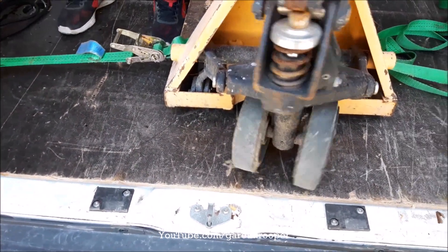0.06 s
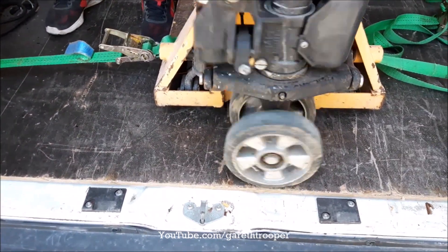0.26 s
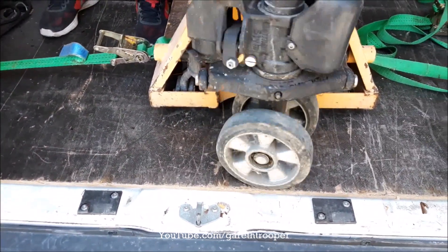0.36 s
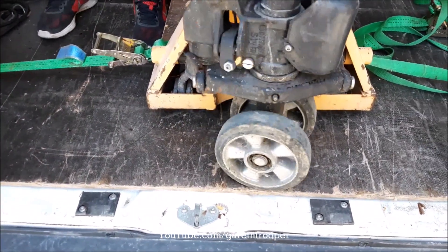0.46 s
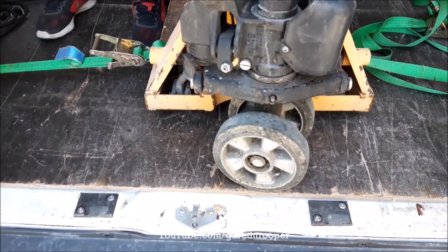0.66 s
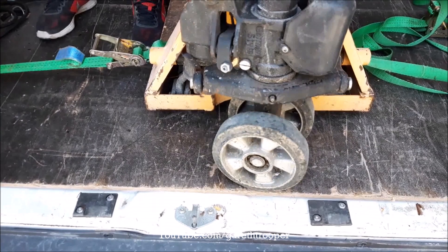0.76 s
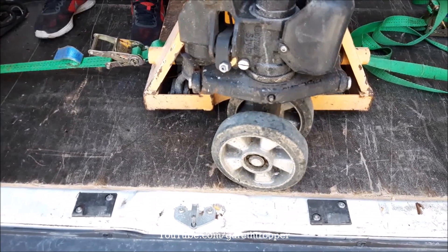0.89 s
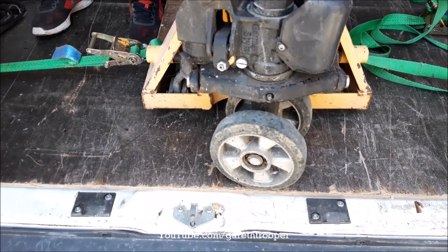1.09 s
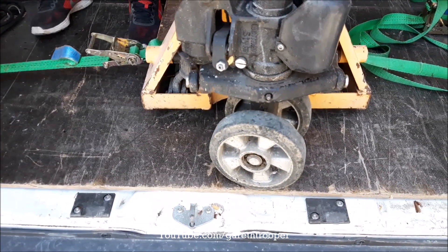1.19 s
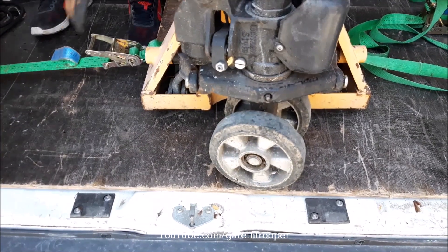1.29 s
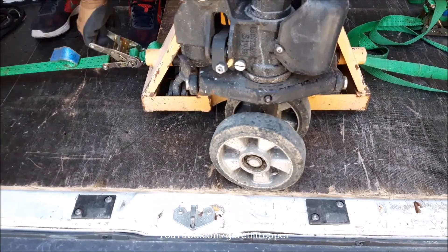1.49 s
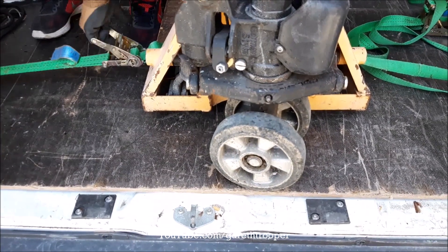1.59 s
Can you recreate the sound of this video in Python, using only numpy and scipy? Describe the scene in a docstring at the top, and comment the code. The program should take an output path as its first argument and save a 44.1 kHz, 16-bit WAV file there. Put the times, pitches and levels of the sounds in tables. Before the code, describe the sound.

A loud, ringing metal clunk from a hand pallet truck's steering hitting its stop, preceded by bright linkage clicks, wheel knocks and tyre scrub; after a quiet gap, a weak strap ratchet clank. Close microphone, lorry deck outdoors.

```python
"""Tyres scrub faintly, a handle linkage clicks and a yard hums: a hand pallet truck's steering wheels
are swung round on a lorry floor. Wheels and handle base knock, then the steering hits its stop with a clunk
that drives the limiter. Later a strap slides, its ratchet clanks and the deck answers late.
Struck parts are decaying tones plus noise dying band by band; scrub, hum and a faint treble hiss are
shaped noise. A long dim echo comes from the yard."""
import sys
import numpy as np
from scipy import signal
from scipy.fft import rfft, irfft
from scipy.io import wavfile
from scipy.ndimage import uniform_filter1d

SR = 44100
rng = np.random.default_rng(int(sys.argv[2]) if len(sys.argv) > 2 else 0)


def magnitude_from_level(level_db):
    """Linear magnitude for a level in decibels (20 dB per decade)."""
    exponent = np.asarray(level_db, float) / 20
    return 10 ** exponent


def wav_out(sig):
    """Save sig, one row per channel (or a flat mono array), as 16-bit PCM at SR to the path in sys.argv[1]."""
    wavfile.write(sys.argv[1], SR, np.round(np.clip(np.atleast_2d(sig).T, -1, 1) * 32767).astype(np.int16))


N = 72765   # length in samples
TIME_S = np.arange(N) / SR
BAND_EDGES_HZ = 22 * 2 ** np.arange(0, 9.6, 1 / 3)   # third-octave steps


def rms_one(x):
    """Scales a signal so that its average strength (root mean square) is one."""
    return x / np.sqrt(np.mean(x ** 2) + 1e-20)


def in_time(rows):
    """Draws straight lines between (time, level) points, one value per sample."""
    return np.interp(TIME_S, *np.transpose(rows))


def at_hz(rows, hz, column=1):
    """Reads a table column at any frequency, along a logarithmic pitch scale."""
    rows = np.array(rows)
    return np.interp(np.log(hz), np.log(rows[:, 0]), rows[:, column])


def bands(lump_db=0):
    """Yields centre and noise of each third-octave band, equally dense; lump_db makes the spectrum uneven."""
    lump_hz, warm_up = 45, 4000   # spacing of the lumps; samples cut off while the filters settle
    white = rng.standard_normal((2, N + warm_up))
    hz = np.fft.rfftfreq(N + warm_up, 1 / SR)
    lumps = magnitude_from_level(lump_db * np.interp(hz / lump_hz, np.arange(2000), rng.standard_normal(2000)))
    white = irfft(rfft(white) * rms_one(lumps), N + warm_up)
    for k, (low, high) in enumerate(zip(BAND_EDGES_HZ, BAND_EDGES_HZ[1:])):
        sos = signal.butter(2, [low, high], "band", fs=SR, output="sos")
        # neighbouring bands use different noises
        yield np.sqrt(low * high), signal.sosfilt(sos, white[k % 2])[warm_up:]


def wobble(rate_per_s, spread_db):
    """Random gain that glides between new values, rate_per_s times a second."""
    knots = rng.standard_normal(200)
    return magnitude_from_level(spread_db * np.interp(TIME_S * rate_per_s, np.arange(200), knots))


def coloured(spectrum, patchy_db):
    """Noise of a given spectrum, each band flickering by itself, at average strength one."""
    total = np.zeros(N)
    for hz, noise in bands():
        total += magnitude_from_level(at_hz(spectrum, hz)) * wobble(30, patchy_db) * noise
    return rms_one(total)


def swell(start_s, hz, t60_s):
    """Envelope of a struck ring: a short rise, then a steady fall of 60 dB per t60_s."""
    rise_cycles = 0.86   # time constant of the rise, in cycles of the ring
    age_s = np.maximum(TIME_S - start_s, 0)
    return (1 - np.exp(-age_s * hz / rise_cycles)) * magnitude_from_level(-60 * age_s / t60_s)


def dense_ring(blows, dense):
    """A part's many close modes, heard as noise dying band by band; each blow opens with a crack."""
    crack_db, crack_t60_s = 2.5, 0.0089   # crack level is above the ring
    out = np.zeros(N)
    density = magnitude_from_level(at_hz(dense, BAND_EDGES_HZ[1:])) ** 2
    size = np.sqrt(np.sum(np.diff(BAND_EDGES_HZ) * density) / (SR / 2))
    for hz, noise in bands(lump_db=2.5):   # close modes bunch unevenly along the spectrum
        t60_s = at_hz(dense, hz, column=2)
        crack = magnitude_from_level(crack_db)
        power = np.zeros(N)
        for start_s, db, length in blows:
            ring_power = swell(start_s, hz, length * t60_s) ** 2
            crack_power = (crack * swell(start_s, hz, crack_t60_s)) ** 2
            power += magnitude_from_level(db) ** 2 * (ring_power + crack_power)
        rattle = wobble(110, 1.5)   # loose parts rattle
        out += magnitude_from_level(at_hz(dense, hz)) / size * np.sqrt(power) * rattle * noise
    return out


def clear_modes(blows, modes, modes_db):
    """The clear tones of a struck part: each mode is a close pair of sines that beat as they die."""
    strength_spread_db = 1.5
    split_hz = 1.2   # widest gap within a pair, per root Hz
    partner = 0.4   # strength of the second sine
    out = np.zeros(N)
    for hz, level_db, t60_s in modes:
        split, phase_one, phase_two = rng.uniform(-1, 1, 3)
        strengths = rng.standard_normal(len(blows))
        power = np.zeros(N)
        for (start_s, db, length), luck in zip(blows, strengths):
            power += (magnitude_from_level(db + strength_spread_db * luck) * swell(start_s, hz, length * t60_s)) ** 2
        gap_hz = np.sign(split) * (1 + abs(split)) / 2 * split_hz * np.sqrt(hz)
        pair = np.sin(2 * np.pi * hz * TIME_S + np.pi * phase_one)
        pair += partner * np.sin(2 * np.pi * (hz + gap_hz) * TIME_S + np.pi * phase_two)
        waver = wobble(35, 2.5)   # modes fade unevenly
        out += magnitude_from_level(modes_db + level_db) * np.sqrt(power) * waver * pair
    return out


def struck(blows, modes, dense, modes_db):
    """Every blow feeds both the clear tones of a part and its many close modes."""
    return dense_ring(blows, dense) + clear_modes(blows, modes, modes_db)


# In all tables of blows, the ring length multiplies the t60 of the part.
# t60 is the time a ring takes to fall by 60 dB.

# Strength of the tyres dragged sideways, before the fade at the stop: (time [s], level [dB])
SCRUB_LEVEL = [(0.0, -41.5), (0.106, -49.5), (0.136, -25), (0.156, -28.5), (0.198, -29.5), (0.244, -34),
               (0.302, -38), (0.34, -29), (0.376, -12.5), (0.426, -20.5), (0.572, -51.5), (0.6, -53.5)]
# Tone colour of the tyres: (frequency [Hz], relative level per Hz [dB])
TYRE_SPECTRUM = [(18, -44), (30, -13), (393, -1.5), (524, -1), (853, -7), (1110, -8.5), (1700, -7.5),
                 (2210, -15), (3370, -12.5), (6000, -23.5), (7800, -50.5), (13200, -120)]


def tyre_scrub():
    """Lumpy low rumble of tyres dragged over the deck, dying once the steering stops."""
    stop_s, fade_db_per_s = 0.38, 200.5
    fade_db = fade_db_per_s * np.maximum(TIME_S - stop_s, 0)
    return magnitude_from_level(in_time(SCRUB_LEVEL) - fade_db) * coloured(TYRE_SPECTRUM, patchy_db=3.5)


# Strength of the yard hum: (time [s], level [dB])
HUM_LEVEL = [(0.75, -59), (0.898, -62.5), (1.46, -66)]
# Tone colour of the hum: (frequency [Hz], relative level per Hz [dB])
HUM_SPECTRUM = [(15, -44.5), (30, -12), (120, -3.5), (270, 0), (400, -11), (620, -14.5), (1100, -12.5),
                (2100, -27), (5000, -32.5), (9500, -35.5), (11000, -45.5), (15500, -52)]


def yard_hum():
    """Faint, mostly low noise from the yard, its bands flickering slightly."""
    return magnitude_from_level(in_time(HUM_LEVEL)) * coloured(HUM_SPECTRUM, patchy_db=1.5)


# Strength of the treble hiss: (time [s], level [dB])
HISS_LEVEL = [(.7, -76.5), (.95, -72), (1.03, -86), (1.14, -83), (1.16, -74.5), (1.3, -79), (1.35, -96),
              (1.65, -95.5)]
# Tone colour of the hiss: (frequency [Hz], relative level per Hz [dB])
HISS_SPECTRUM = [(1180, -35), (2000, -6.5), (2200, -18), (2540, -2), (3330, -10), (4360, 1.5), (4950, -6),
                 (12000, -24), (15600, -51.5), (22000, -120)]


def treble_hiss():
    """Faint treble background hiss whose level rises and falls."""
    return magnitude_from_level(in_time(HISS_LEVEL)) * coloured(HISS_SPECTRUM, patchy_db=2.5)


def yard_echo(near):
    """Long dim echo from the yard: the near sound is smeared over slowly dying, band-limited noise."""
    level_db, t60_s, low_hz, high_hz = -50.5, 1.4, 500, 7000
    tail = rng.standard_normal(N) * magnitude_from_level(-60 * TIME_S / t60_s)
    tail = signal.sosfilt(signal.butter(1, [low_hz, high_hz], "band", fs=SR, output="sos"), tail)
    tail = tail / np.sqrt(np.sum(tail ** 2))
    return magnitude_from_level(level_db) * signal.fftconvolve(near, tail)[:N]


# Blows on the handle linkage: (time [s], level [dB], ring length [factor])
LINKAGE_BLOWS = [(.004, -45.5, 1), (.013, -25.5, 0.74), (.0175, -29.5, .6), (.023, -32.5, 2.7),
                 (.0777, -25, 1.2), (.215, -26.5, 1.5), (.27, -29.5, 1.9), (.333, -31, 0.24),
                 (.527, -37, 0.41), (.536, -40, 1.5)]
# Its clear tones: (frequency [Hz], relative level [dB], t60 [s])
LINKAGE_TONES = [(4500, 4, 0.02), (5460, -12, 0.24), (6740, 1.5, 0.049), (7640, -6.5, 0.046),
                 (10100, -17.5, 0.17), (11030, -26, 0.25), (11510, -15.5, 0.17), (13800, -21.5, 0.082)]
# Its dense ring: (frequency [Hz], relative level [dB], t60 [s])
LINKAGE_RING = [(1477, -35, .12), (3300, -10.5, .15), (4300, -1.5, 0.059), (7000, -0.5, .11),
                (10000, -5.5, 0.063), (12120, -7.5, 0.06), (15500, -9.5, .09)]


def linkage_clicks():
    """The handle linkage clicks: light blows with a bright ring."""
    return struck(LINKAGE_BLOWS, LINKAGE_TONES, LINKAGE_RING, modes_db=-5.5)


# Single short rings: (time [s], frequency [Hz], level [dB], t60 [s])
SMALL_RINGS = [(.008, 1935, -43, 0.056), (.13, 230, -24.5, 0.082), (.152, 251, -13.5, 0.056),
               (.259, 7660, -34, 0.12), (.271, 7550, -27.5, .1), (.332, 3200, -28, .012),
               (.3345, 4800, -30, .012), (.337, 2400, -30, .012), (.325, 408, -23.5, .1),
               (.336, 433, -34, .05), (1.119, 3300, -62, 0.01), (1.123, 3600, -55.5, 0.022),
               (1.151, 6100, -50.5, 0.0085), (1.1505, 7600, -63, .003), (1.1505, 9300, -60, .003)]


def small_ticks():
    """Small parts and the deck tick: each is one short sine ring."""
    out = np.zeros(N)
    for start_s, hz, db, t60_s in SMALL_RINGS:
        out += magnitude_from_level(db) * swell(start_s, hz, t60_s) * np.sin(2 * np.pi * hz * (TIME_S - start_s))
    return out


# Blows on the wheels: (time [s], level [dB], ring length [factor])
WHEEL_BLOWS = [(.1095, -22, 0.62), (.1235, -40, 0.66), (.137, -34, 1)]
# Their clear tones: (frequency [Hz], relative level [dB], t60 [s])
WHEEL_TONES = [(249, -11, 0.28), (560, -9, 0.22), (758, -6, 0.41), (1510.3, 1.5, .22), (1980, -2, .15),
               (3250, -2, .16), (4330, -7, .12), (4700, -4, .12), (5200, -2, 0.13), (6788, -13, 0.14),
               (9140, -18, .17)]
# Their dense ring: (frequency [Hz], relative level [dB], t60 [s])
WHEEL_RING = [(150, -23, .4), (300, -6, 0.32), (905, -4, 0.21), (1740, -0.5, 0.21), (3200, -6.5, 0.19),
              (4714, -10, .3), (7000, -17.5, 0.41), (11000, -21, 0.22), (15630, -28, .3)]


def wheel_knocks():
    """The wheels knock, ringing mostly below the clicks of the linkage."""
    return struck(WHEEL_BLOWS, WHEEL_TONES, WHEEL_RING, modes_db=-6)


# Blows on the handle base: (time [s], level [dB], ring length [factor])
BASE_BLOWS = [(.23, -21.5, 0.48), (.234, -20, 0.96), (.258, -30.5, 0.58)]
# Its clear tones: (frequency [Hz], relative level [dB], t60 [s])
BASE_TONES = [(238, -4.5, .2), (524.2, -11.5, .2), (654, -15.5, .35), (797, -6.5, 0.49), (1219, -5.5, 0.67),
              (1295, -6, .35), (1810, -14, .15), (2100, -1, 0.42), (2760, -16, 0.18), (3160, -11.5, 0.31),
              (3740, -12.5, .24), (4760, -19.5, .14), (8899, -30.5, .3), (13300, -32, .3)]
# Its dense ring: (frequency [Hz], relative level [dB], t60 [s])
BASE_RING = [(306, -1, 0.13), (714, -2.5, 0.57), (1300, 1, 0.36), (2100, -3.5, 0.32), (3600, -10, 0.83),
             (5600, -21, .3), (10000, -22, 0.1), (15500, -34.5, .3)]


def handle_base_knocks():
    """The handle base knocks, with strong low and middle tones."""
    return struck(BASE_BLOWS, BASE_TONES, BASE_RING, modes_db=-0.5)


# Blows of the steering on its stop: (time [s], level [dB], ring length [factor])
STOP_BLOWS = [(.3512, -2, 0.7), (.357, -2.5, 0.61), (.364, -2, 0.83), (.382, -9, 1), (.412, -13, 1),
              (.443, -16.5, 0.58)]
# Clear tones of the truck frame: (frequency [Hz], relative level [dB], t60 [s])
FRAME_TONES = [(254, 5, .22), (786, -8, .38), (851, -5, .39), (1217, -8, .33), (1357, -9, .4),
               (1504, -2, .35), (1522, -1, .26), (1724, -2, .26), (1878, -4, .26), (2019, -6, .26),
               (2304, -10, .38), (2519, -11, .4), (2697, -9, .33), (2839, 3, .22), (3079, -6, .32),
               (3311, -3, .24), (3450, 0, .28), (3601, -5, .26), (3795, -5, .24), (4066, -7, .3),
               (4585, -8, .25), (5076, -11, .25), (6387, -22, .48), (6850, -12, .2), (9722, -29, .45),
               (13300, -37, .4)]
# Dense ring of the frame: (frequency [Hz], relative level [dB], t60 [s])
FRAME_RING = [(100, -25, 0.67), (250, -8, 0.58), (450, -9, 0.24), (740, -2, .38), (1400, -3, .35),
              (3200, 2, 0.34), (5070, -6, .33), (6870, -4.5, 0.24), (8800, -15, 0.19), (11900, -20, 0.23),
              (15500, -32.5, .25)]


def steering_stop_clunk():
    """The steering hits its stop: several hard blows set the frame ringing."""
    return struck(STOP_BLOWS, FRAME_TONES, FRAME_RING, modes_db=-7.5)


def strap_rub():
    """The strap slides before the clank: a short swell of narrow hiss."""
    start_s, length_s = 1.375, 0.18
    centre_hz, width_hz, level_db = 3480, 520, -76.5
    shape = np.sin(np.pi * np.clip((TIME_S - start_s) / length_s, 0, 1))
    edges_hz = [centre_hz - width_hz / 2, centre_hz + width_hz / 2]
    sos = signal.butter(2, edges_hz, "band", fs=SR, output="sos")
    return magnitude_from_level(level_db) * shape * rms_one(signal.sosfilt(sos, rng.standard_normal(N)))


# Blows in the strap ratchet: (time [s], level [dB], ring length [factor])
RATCHET_BLOWS = [(1.478, -40, .2), (1.491, -41, 0.33), (1.496, -29.5, 0.19), (1.499, -29, 0.096),
                 (1.504, -38.5, 1), (1.512, -44.5, .5), (1.526, -44.5, 0.87), (1.539, -49, 0.56),
                 (1.552, -52.5, 1), (1.576, -53.5, 1)]
# Its clear tones: (frequency [Hz], relative level [dB], t60 [s])
RATCHET_TONES = [(1395, -17, 0.19), (2280, -20, 0.46), (3300, -14, .35), (3600, -11.5, 0.22),
                 (3850, -5, 0.413), (3941, -4.5, .45), (4100, -4, 0.23), (5330, -4.5, .2), (6300, -10, .3),
                 (9100, 2, 0.069)]
# Its dense ring: (frequency [Hz], relative level [dB], t60 [s])
RATCHET_RING = [(119, -22, 0.48), (298, -16, 0.9), (616, -16, .35), (1011, -22.5, 0.38),
                (2116, -15.5, 0.63), (3996, 1.5, 0.35), (5340, -8, 0.386), (7000, -2, 0.28),
                (9250, -3.5, 0.221), (11000, -5.5, 0.198), (15500, -16, 0.16)]


def ratchet_clanks():
    """The strap ratchet clanks: a quick run of blows on bright metal."""
    return struck(RATCHET_BLOWS, RATCHET_TONES, RATCHET_RING, modes_db=-3.5)


# Thuds of the deck: (time [s], level [dB], ring length [factor])
DECK_BLOWS = [(1.503, -50, 1), (1.525, -51.5, 1), (1.62, -60.5, 1)]
# Dense ring of the deck: (frequency [Hz], relative level [dB], t60 [s])
DECK_RING = [(30, -20, .4), (120, -10, 0.89), (295, 1, 0.29), (600, -5, 0.24), (900, -10, 0.24),
             (2000, -38, .2)]


def deck_thuds():
    """The deck answers the ratchet late, as low noise without clear tones."""
    return struck(DECK_BLOWS, [], DECK_RING, modes_db=0)


def scene():
    """Adds the near sounds, their echo, the strap, the hum and the treble hiss into one channel."""
    near = tyre_scrub() + linkage_clicks() + small_ticks() + wheel_knocks() + handle_base_knocks()
    near += steering_stop_clunk() + ratchet_clanks() + deck_thuds()
    mix = near + yard_echo(near) + strap_rub() + yard_hum() + treble_hiss()
    return mix[None]


def top_cut(x):
    """Nothing passes above the cut-off."""
    return signal.sosfilt(signal.butter(12, 16330, fs=SR, output="sos"), x)


def record(dry):
    """A look-ahead limiter turns loud moments down, the top treble is cut and peaks are rounded."""
    limit_db, release_db_per_s, look_ahead_s = -9, 398, 0.0034   # limit before the peak rounding
    cutoff_hz = 16100
    ahead = int(look_ahead_s * SR)
    level_db = 10 * np.log10(uniform_filter1d(dry[0] ** 2, size=300) + 1e-12)
    # follow rises at once, but let the level fall only at the release rate
    ramp_db = release_db_per_s * TIME_S
    followed_db = np.maximum.accumulate(level_db + ramp_db) - ramp_db
    over_db = np.maximum(followed_db - limit_db, 0)
    # act early, and smoothly
    over_db = uniform_filter1d(np.append(over_db[ahead:], np.zeros(ahead)), size=100)
    low_pass = signal.cheby2(10, 60, cutoff_hz, fs=SR, output="sos")
    held = signal.sosfilt(low_pass, dry * magnitude_from_level(-over_db))
    finished = 1.218 * np.tanh(held / 1.338)
    return top_cut(finished)


dry = scene()
out = record(dry)
wav_out(out)
```